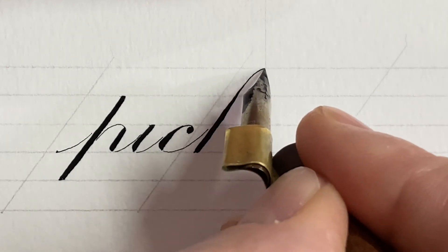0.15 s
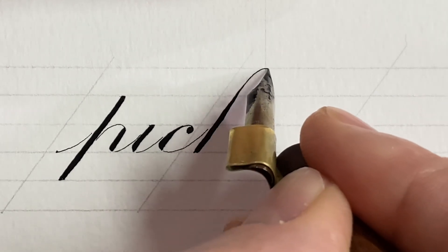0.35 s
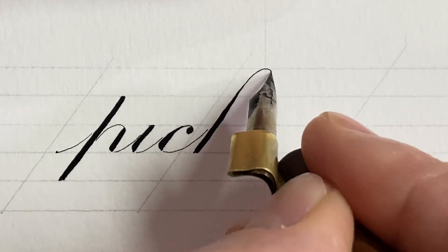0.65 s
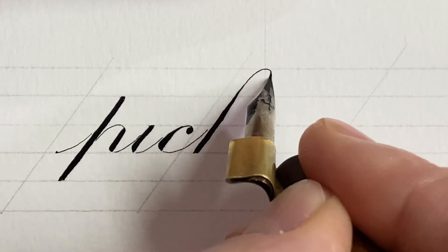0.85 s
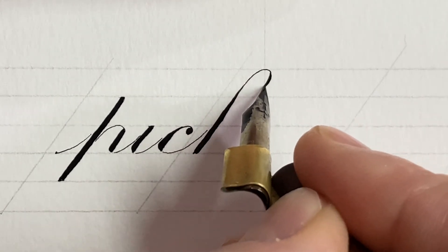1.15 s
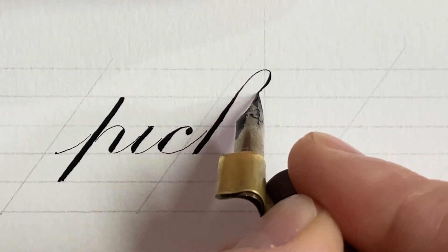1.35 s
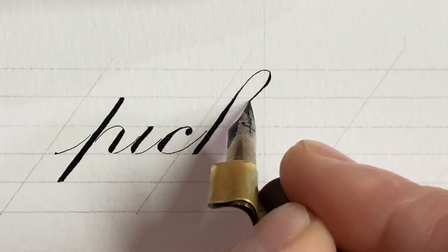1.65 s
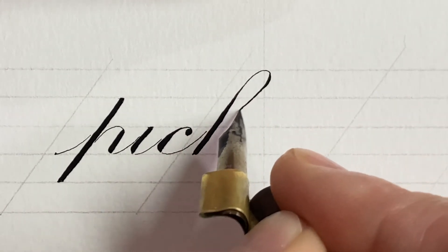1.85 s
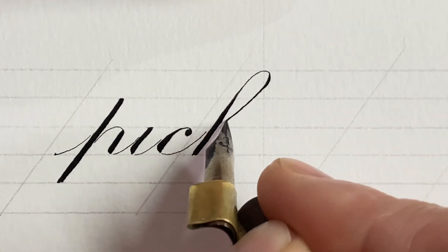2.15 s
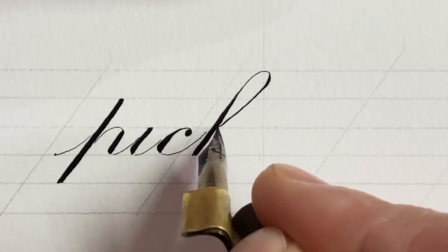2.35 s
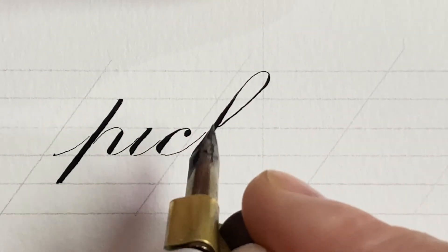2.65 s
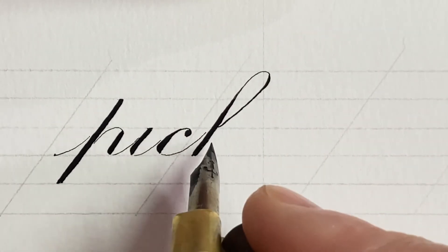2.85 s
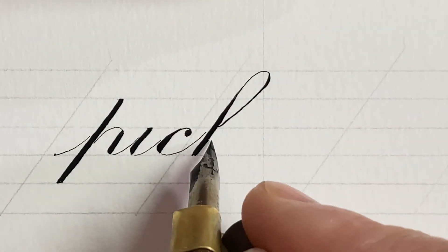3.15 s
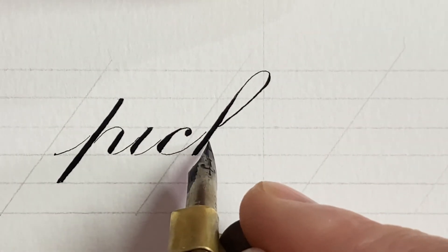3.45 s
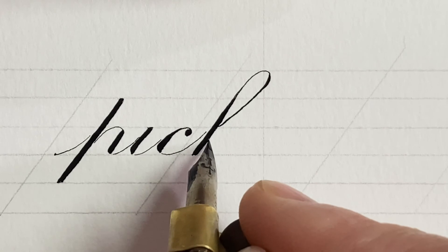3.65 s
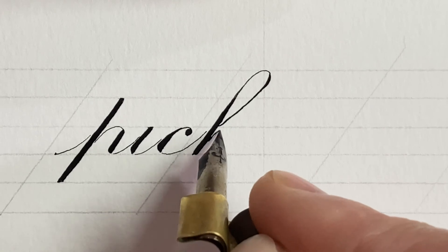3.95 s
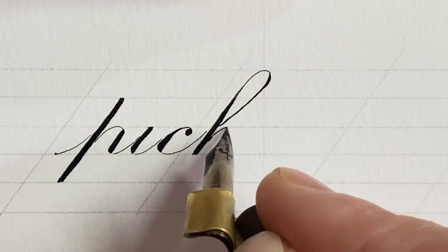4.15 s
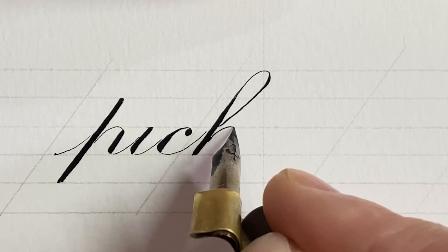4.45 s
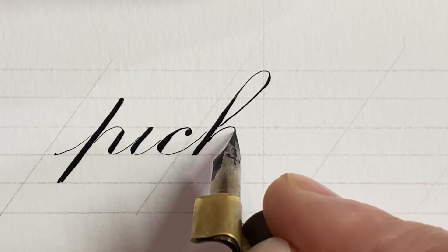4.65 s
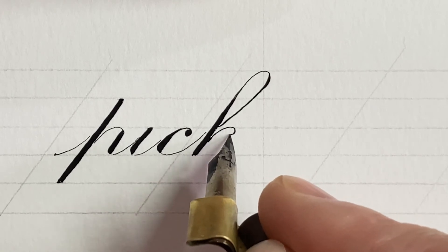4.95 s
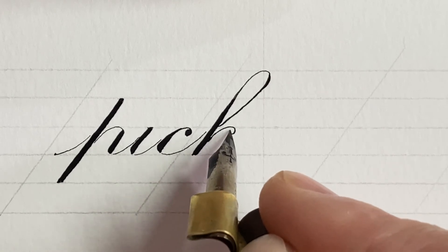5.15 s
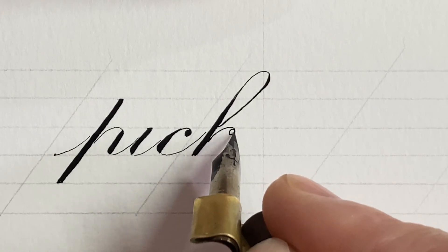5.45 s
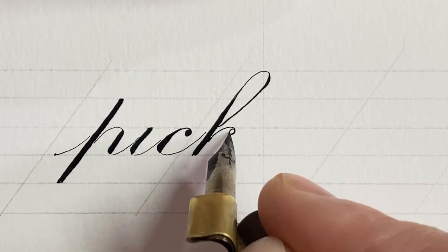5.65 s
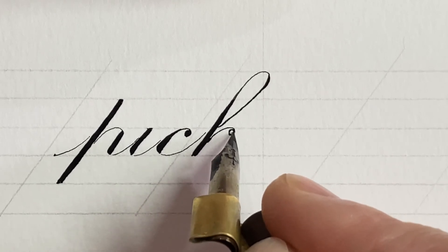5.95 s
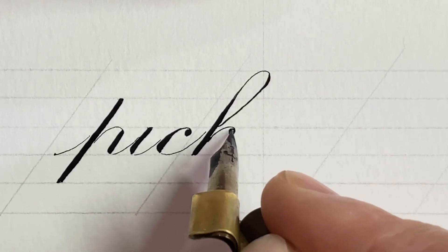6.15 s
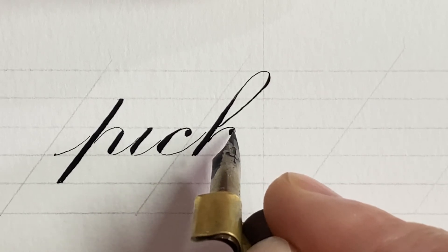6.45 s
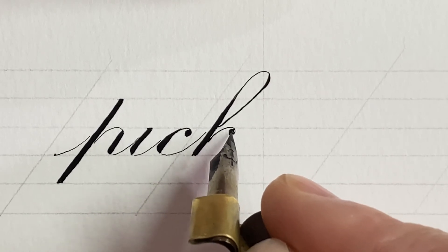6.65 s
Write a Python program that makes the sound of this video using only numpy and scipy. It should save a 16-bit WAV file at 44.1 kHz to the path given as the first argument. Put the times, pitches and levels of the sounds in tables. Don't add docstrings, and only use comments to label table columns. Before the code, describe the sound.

A small quiet indoor space, microphone very close to the paper: low mains hum, soft airy hiss and lumpy deep rumble, with occasional muffled floor thuds, one early at 0.2 s and the deepest near 2.7 s. From about 0.75 s a steel nib drags slowly over paper, first faint, then in sharp, bright, irregular ticks, strongest around 1.1 and 1.4 s, dense and crackly with a fine dry rasp until 2.25 s. Each tick is tiny, metallic and very short. At 2.4-2.5 s the pen lifts: dull knocks, one heavy tap ringing the desk briefly, and a short skin brush on paper. Mostly room tone until 3.75 s, then soft knocks and faint high tickles to 4.2 s. Small scratch clusters follow at 4.7-4.9, 5.4, 5.95, 6.3 and 6.57 s, then hum alone.

```python
import sys
import numpy as np
from scipy import signal
from scipy.fft import rfft, irfft
from scipy.io import wavfile
from scipy.ndimage import uniform_filter1d, minimum_filter1d

SR = 44100
rng = np.random.default_rng(int(sys.argv[2]) if len(sys.argv) > 2 else 0)


def output_pcm(signal):
    pcm = np.clip(np.atleast_2d(signal).T, -1, 1) * 32767
    wavfile.write(sys.argv[1], SR, np.round(pcm).astype(np.int16))


def level_to_linear(level):
    exponent = np.asarray(level, float) / 20
    return 10 ** exponent


N = 299873
CONTACT_LENGTH = 2600

# pitch_hz, level_db, t60_s
TINE_MODES = [(11630, -20.5, 0.0075), (12050, -9.5, 0.0048), (12720, -7.5, 0.0048), (13040, -6, 0.0055),
              (13660, -13, 0.004), (14680, -1.5, 0.0035), (14530, 2.5, 0.0069), (15200, -6, 0.0032),
              (15540, -8, 0.0033), (15720, -8, 0.0037), (16300, -8, 0.003)]
# pitch_hz, level_db, t60_s
BODY_MODES = [(4280, -18.5, 0.0043), (4980, -16.5, 0.0066), (6470, 0.5, 0.003), (6630, -8, 0.017),
              (7150, -0.5, 0.0087), (7446, 0, 0.0074), (8460, -8.5, 0.009), (9420, -13.5, 0.0092),
              (10110, -12, 0.0077)]
# pitch_hz, level_db, t60_s
PAPER_MODES = [(850, -1.5, 0.0069), (1214, 1.5, 0.0093), (1580, 0, 0.011), (2020, -2.5, 0.014),
               (2474, 4.5, 0.0056), (3160, -16, 0.016)]


def rms_one(x):
    return x / np.sqrt(np.mean(x ** 2) + 1e-20)


def noise(count=N):
    return rng.standard_normal(count)


def in_time(rows):
    s, level_db = np.transpose(rows)
    return level_to_linear(np.interp(np.arange(N) / SR, s, level_db, left=-150, right=-150))


def band(x, low_hz, high_hz, order=2):
    edges_hz = [low_hz, min(high_hz, .45 * SR)]
    return signal.sosfilt(signal.butter(order, edges_hz, "band", fs=SR, output="sos"), x)


def ring(force, hz, t60):
    r = level_to_linear(-60 / (t60 * SR))
    w = 2 * np.pi * hz / SR
    return signal.lfilter([0, np.sin(w)], [1, -2 * r * np.cos(w), r * r], force)


def place(times, sounds):
    out = np.zeros(N + CONTACT_LENGTH)
    for s, sound in zip(times, sounds):
        start = round(s * SR)
        out[start:start + CONTACT_LENGTH] += sound
    return out[:N]


def lumpy(low_hz, high_hz, level_db, lump_db, lump_hz):
    settle = 2 * SR
    low = band(noise(N + settle), low_hz, high_hz, order=3)[settle:]
    wander = band(noise(N + settle), 0.9, lump_hz, order=1)[settle:]
    return level_to_linear(level_db) * rms_one(low * level_to_linear(lump_db * rms_one(wander)))


def thuds():
    # centre_s, length_s, level_db, pitch_hz
    floor_thuds = [
        (0.201, 0.066, -42, 37.3),
        (0.949, 0.5, -52, 65.6),
        (1.479, 0.071, -43.5, 31.3),
        (2.692, 0.067, -33, 20.6),
        (3.747, 0.11, -52, 60),
        (4.525, 0.041, -44, 40),
        (4.92, 0.028, -46, 40.7),
        (5.224, .07, -47, 38.8),
        (5.919, 0.052, -52, 62.4),
        (6.224, .08, -50, 40),
    ]
    t = np.arange(N) / SR
    out = np.zeros(N)
    for s, length_s, level_db, hz in floor_thuds:
        swell = np.exp(-((t - s) / length_s) ** 2)
        out -= np.sqrt(2) * level_to_linear(level_db) * swell * np.cos(2 * np.pi * hz * (t - s))
    return out


def room_tone():
    # pitch_hz, density_db (per Hz)
    air_colour = [(40, -1), (60, 2), (85, -5.5), (140, -7.5), (175, -6), (270, -10), (330, -15),
                  (450, -11.5), (700, -21.5), (1100, -21.5), (1600, -28), (3000, -31.5), (6000, -34),
                  (16000, -35.5)]
    # pitch_hz, level_db (rms)
    mains = [(120.5, -53), (240.7, -63.5), (59.45, -72.5)]
    colour_hz, colour_db = np.transpose(air_colour)
    hz = np.fft.rfftfreq(N, 1 / SR) + 1
    colour = level_to_linear(np.interp(np.log(hz), np.log(colour_hz), colour_db, left=-60))
    air = level_to_linear(-54) * rms_one(irfft(rfft(noise()) * colour, N))

    rumble = lumpy(25, 42.7, level_db=-51, lump_db=1.5, lump_hz=8.0)
    sway = lumpy(3.3, 16.2, level_db=-49.5, lump_db=3.0, lump_hz=4.6)

    t = np.arange(N) / SR
    waver_db = 0.23 * rms_one(band(noise(N + SR), 0.56, 2.4, order=1)[SR:])
    hum = sum(np.sqrt(2) * level_to_linear(level_db + waver_db) * np.sin(2 * np.pi * pitch_hz * t)
              for pitch_hz, level_db in mains)
    return air + rumble + sway + thuds() + hum


def rasp():
    # time_s, level_db
    pressure = [
        (.7, -87),
        (1.2, -66),
        (1.3, -75),
        (1.42, -73),
        (1.7, -63),
        (1.87, -64.5),
        (2.13, -74),
        (2.25, -57),
        (2.3, -83),
    ]
    catches = rng.random(N) < 700 / SR
    size = level_to_linear(3.5 * np.minimum(rng.exponential(1, N), 4))
    grains = catches * size * rng.choice([-1, 1], N) + 1e-18
    sheet = sum(level_to_linear(level_db) * ring(grains, hz, t60) for hz, level_db, t60 in PAPER_MODES)
    steel = sum(level_to_linear(level_db) * ring(grains, hz, t60) for hz, level_db, t60 in TINE_MODES + BODY_MODES)
    return in_time(pressure) * (rms_one(sheet) + level_to_linear(-2.5) * rms_one(steel))


def slip_force(count, rise_s, fall_s, rough, kick):
    t = np.arange(CONTACT_LENGTH) / SR
    shape = np.where(t < rise_s, (t / rise_s) ** 2, np.exp(-(t - rise_s) / fall_s))
    release = kick * np.eye(1, CONTACT_LENGTH, round(rise_s * SR))
    return release + shape * rough * noise((count, CONTACT_LENGTH))


def struck(force, modes, peak_db, spread_db=2.5):
    uneven = level_to_linear(spread_db * noise((len(force), len(modes))))
    rings = 0
    for k, (hz, level_db, t60) in enumerate(modes):
        rings = rings + (-1) ** k * uneven[:, [k]] * level_to_linear(level_db) * ring(force, hz, t60)
    loudest = np.sqrt(2 * uniform_filter1d(rings[:, :300] ** 2, size=40).max(axis=1))
    return rings * (level_to_linear(peak_db) / loudest)[:, None]


def nib():
    # time_s, tine_db, body_db, paper_db
    loop_slips = [(0.7485, -56, -68, -64), (0.7621, -44, -46, -45), (0.8056, -53, -65, -56),
                  (0.8389, -53, -63, -50.5), (0.8685, -41, -47, -47), (0.9084, -50, -70, -62),
                  (0.9695, -54, -62, -45), (0.9755, -33, -45.5, -44.5), (1.0732, -39, -48, -42.5),
                  (1.083, -46, -52, -47), (1.0932, -27, -33.5, -41), (1.1122, -40, -45, -41.5),
                  (1.1203, -21, -31.5, -48), (1.1388, -24, -34, -39.5), (1.1902, -48, -64, -56),
                  (1.2043, -30, -34, -38.5), (1.2151, -33, -42, -38), (1.2308, -48, -47, -44),
                  (1.25, -34.5, -43, -43), (1.274, -57, -62, -56), (1.287, -44, -52, -49.5),
                  (1.3335, -56, -69, -64), (1.3755, -54, -69, -61),
                  (1.3924, -19, -32, -36), (1.4145, -22.5, -33, -37.5), (1.426, -50, -53, -44),
                 (1.4502, -39, -51, -47), (1.485, -43, -57, -43), (1.5213, -26.5, -34.5, -44),
                 (1.531, -48, -54, -43), (1.5428, -39, -40.5, -45), (1.561, -34, -37, -39.5),
                 (1.577, -47, -56, -47), (1.597, -41, -44.5, -44), (1.628, -55, -64, -48),
                 (1.6443, -45, -56, -45), (1.6504, -36, -43, -42), (1.6647, -40, -47, -42),
                 (1.668, -42, -52, -48), (1.678, -38, -49, -41.5), (1.703, -30, -34.5, -42),
                 (1.7115, -41, -46, -42), (1.7286, -45, -60, -63), (1.7549, -42, -47, -61),
                 (1.7733, -38, -43.5, -39), (1.791, -29.5, -36, -40), (1.799, -35, -45, -39.5),
                 (1.814, -33, -47, -40), (1.8252, -34, -43, -44), (1.8294, -38, -42, -46),
                 (1.8448, -28, -36.5, -40),
                  (1.8766, -42, -52, -50), (1.899, -36.5, -45.5, -44), (1.915, -41, -50, -51),
                 (1.9225, -45, -53, -43), (1.9496, -39, -55, -57), (1.9551, -46, -43.5, -44),
                 (1.9598, -35, -41, -45), (1.9665, -32, -41.5, -49), (2.016, -36, -37.5, -38),
                 (2.025, -49, -55, -54), (2.0366, -49, -59, -49), (2.0533, -22, -33.5, -35.5),
                 (2.098, -39, -51, -48), (2.1077, -27.5, -36, -44.5), (2.1452, -42, -42.5, -41.5),
                 (2.149, -46, -50, -48), (2.1941, -44, -42.5, -43.5), (2.213, -49, -41, -46),
                 (2.2221, -44, -59, -45), (2.24, -31, -39.5, -43), (2.246, -48, -52, -49)]
    curl = [(4.712, -32.5, -46.5, -44), (4.7247, -42, -53, -48), (4.7478, -40, -40, -43.5),
            (4.8248, -33, -40.5, -43), (4.848, -52, -56, -51), (4.8934, -47, -50.5, -56),
            (5.401, -56, -62, -51.5), (5.433, -36, -45, -43.5), (5.4522, -36, -43, -43),
            (5.937, -62, -66, -48), (5.9514, -26.5, -35, -42.5), (5.982, -37, -46, -47.5),
            (5.991, -52, -50, -55), (6.309, -55, -55, -44.5), (6.3141, -34, -40.5, -41.5),
            (6.5634, -53, -70, -50.5), (6.568, -44, -51.5, -52)]
    # time_s, tine_db
    hairline = [
        (3.828, -56),
        (3.870, -56),
        (3.877, -57),
        (3.975, -55),
        (3.99, -58),
        (4.052, -50),
        (4.081, -58),
        (4.217, -52),
    ]
    # pitch_hz, level_db, t60_s
    shank_modes = [(3460, 7, .042), (3330, -11, 0.013), (3410, -3.5, 0.038)]
    hair_s, hair_db = np.transpose(hairline)
    hair_slips = np.column_stack([hair_s, hair_db, hair_db - 14, hair_db - 16])
    slips = np.vstack([loop_slips, hair_slips, curl])
    s, tine_db, body_db, paper_db = slips.T
    count = len(s)

    shank_db = -54.5 + 0.63 * (body_db + 43)
    shank_db += 2.5 * (s > 1.88)
    shank_db -= 2.5 * (s < 1.05)
    rebound = (np.diff(s, prepend=0) < .013) & (np.diff(tine_db, prepend=0) < 0)
    shank_db -= 17 * rebound

    snap = slip_force(count, rise_s=.0005, fall_s=.00015, rough=.5, kick=5)
    steel = struck(snap, TINE_MODES, tine_db + 1.0) + struck(snap, BODY_MODES, body_db + .5)
    fray = slip_force(count, rise_s=.0005, fall_s=.00072, rough=1.6, kick=1.1)
    crack = band(fray, 3580, 11000)
    steel += crack * (level_to_linear(body_db - 5.5) / np.abs(crack).max(axis=1))[:, None]

    push = slip_force(count, rise_s=.00042, fall_s=.0007, rough=.3, kick=5)
    holder = struck(push, PAPER_MODES, paper_db) + struck(push, shank_modes, shank_db)
    return place(s - .0008, steel) + place(s - .001, holder)


def reflections(x):
    t60_s, gap_s = .085, .0025
    t = np.arange(6000) / SR
    tail = noise(len(t)) * level_to_linear(-60 * t / t60_s) * np.clip(t / gap_s - 1, 0, 1)
    return level_to_linear(-38.5) * signal.fftconvolve(x, tail)[:N]


def taps():
    # time_s, tick_db, knock_db, knock_hz
    contacts = [
        (2.371, -54, -70, 900),
        (2.3825, -50, -58, 905),
        (2.42, -56, -45, 850),
        (2.486, -31.5, -30.5, 995),
        (3.757, -42.5, -43, 1500),
        (3.8267, -50, -37, 1300),
        (3.87, -56, -46, 1310),
        (3.975, -58, -62, 1400),
        (4.052, -46, -35, 1370),
        (4.216, -51, -42.5, 1600),
    ]
    # pitch_hz, level_db, t60_s
    desk_modes = [(189, -42, 0.091), (670, -38.5, 0.054), (960, -34, 0.021), (1310, -49, 0.02),
                  (2720, -53, 0.011)]
    # time_s, level_db
    desk_blows = [
        (2.4204, -4.5),
        (2.4879, 0.5),
    ]
    force = slip_force(len(contacts), rise_s=.00051, fall_s=.0016, rough=1.2, kick=5.5)
    tick = band(force, 1900, 21600) + band(force, 1900, 3700) + band(force, 12200, 15300)
    tick = tick / np.abs(tick).max(axis=1)[:, None]
    click = np.eye(1, CONTACT_LENGTH)[0]
    pad = np.convolve(click, np.hanning(14) / 5)[:CONTACT_LENGTH]
    sounds = [level_to_linear(tick_db + 5.5) * one + level_to_linear(knock_db) * ring(pad, hz, 8.3 / hz)
              for one, (s, tick_db, knock_db, hz) in zip(tick, contacts)]
    desk = sum(level_to_linear(level_db) * ring(click, hz, t60) for hz, level_db, t60 in desk_modes)
    blow_s, blow_db = np.transpose(desk_blows)
    blows = [level_to_linear(level_db) * desk for level_db in blow_db]
    return place(np.array(contacts)[:, 0] - .0006, sounds) + place(blow_s, blows)


def stroke(start_s, attack_s, hold_s, release_s, level_db):
    s = start_s + np.cumsum([0, attack_s, hold_s, release_s])
    return in_time(np.transpose([s, level_db - 15 * np.array([1, 0, 0, 1])]))


def brush():
    patches = level_to_linear(2.0 * rms_one(band(noise(), 30, 250)))
    hiss = band(noise(), 6200, 21000) + 1.2 * band(noise(), 5200, 6000) + band(noise(), 10600, 15500)
    drag = band(noise(), 300, 1200)
    slide = stroke(2.375, attack_s=.025, hold_s=.06, release_s=.035, level_db=-55.5)
    rub = stroke(2.4, attack_s=.025, hold_s=.04, release_s=.02, level_db=-57)
    return slide * rms_one(patches * hiss) + rub * rms_one(patches * drag)


def scene():
    close = rasp() + nib() + taps() + brush()
    return (room_tone() + close + reflections(close))[None]


def band_limit(x):
    return signal.sosfilt(signal.butter(12, 17130, fs=SR, output="sos"), x)


def record(dry):
    steady_top_hz, click_top_hz, click_db = 15850, 17100, -58
    hz = np.fft.rfftfreq(N, 1 / SR)
    spectrum = rfft(dry)
    fade_in = np.clip((hz - steady_top_hz) / 60, 0, 1)
    fade_out = np.clip((click_top_hz - hz) / (click_top_hz - steady_top_hz), 0, 1) ** 2
    top = irfft(spectrum * fade_in * fade_out, N)
    below = irfft(spectrum * np.clip((steady_top_hz + 60 - hz) / 60, 0, 1), N)
    click = uniform_filter1d(top ** 2, size=130) > level_to_linear(2 * click_db)
    widened = -minimum_filter1d(-1. * click, size=90)
    gate = uniform_filter1d(widened, size=60)
    return band_limit(below + gate * top)


dry = scene()
out = record(dry)
output_pcm(out)
```